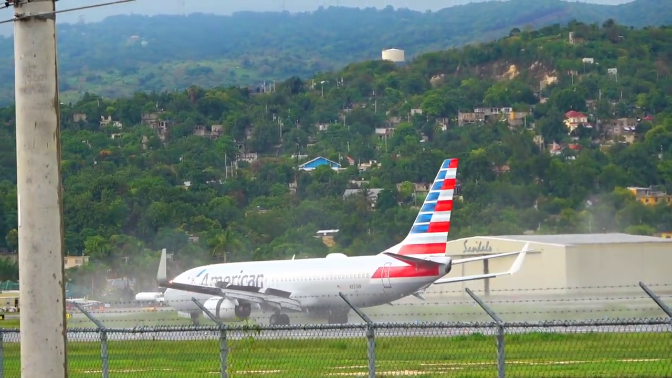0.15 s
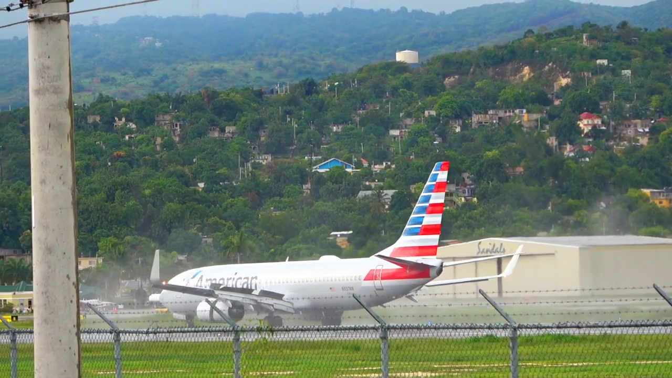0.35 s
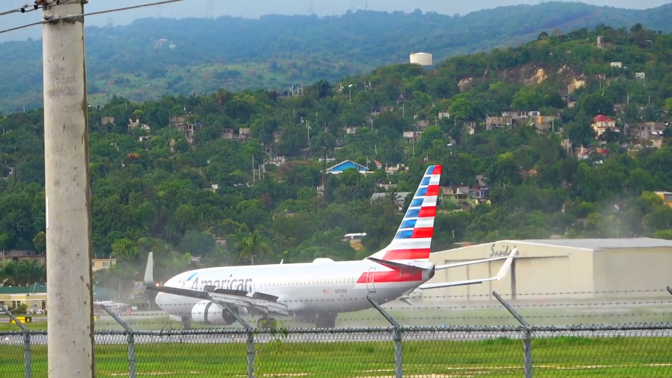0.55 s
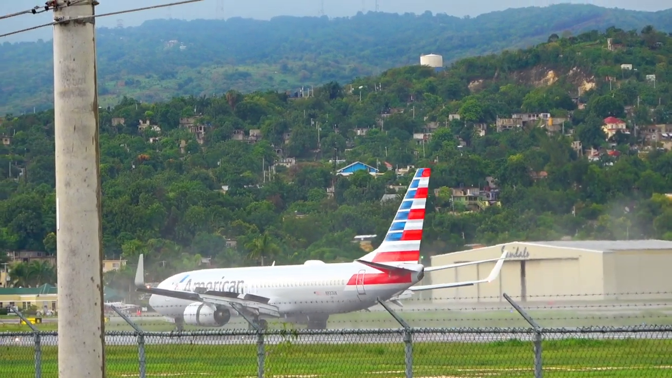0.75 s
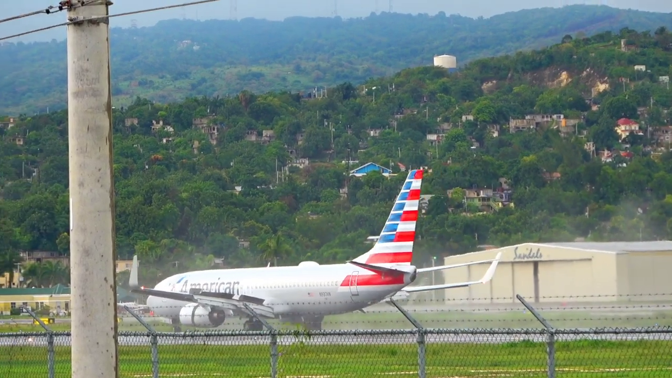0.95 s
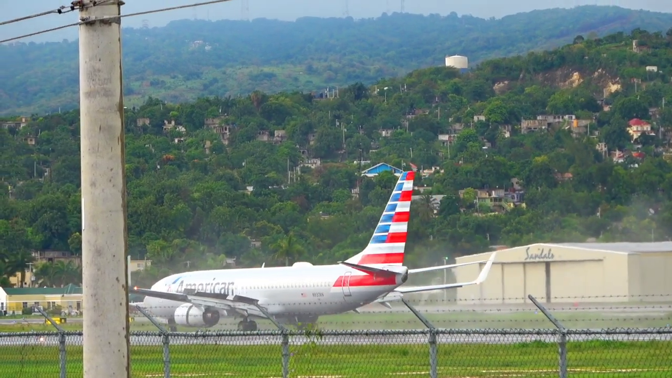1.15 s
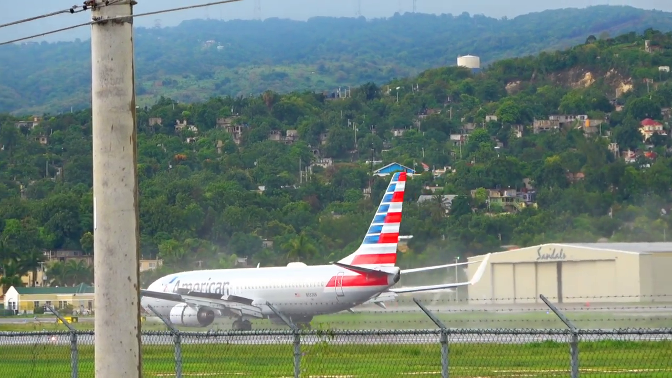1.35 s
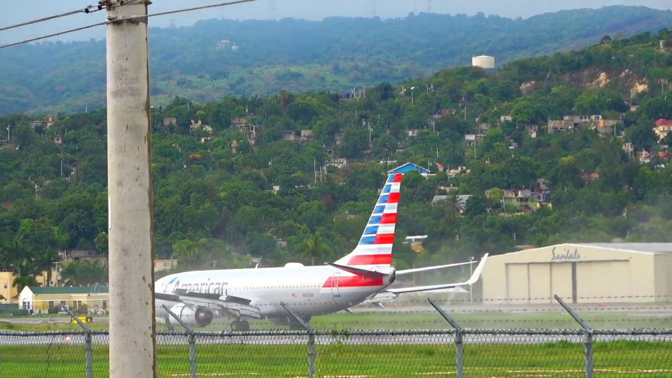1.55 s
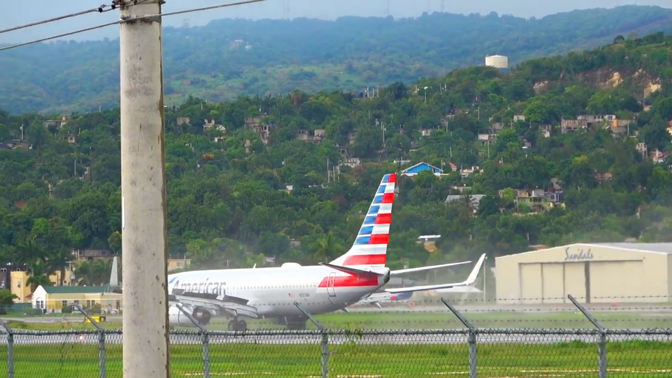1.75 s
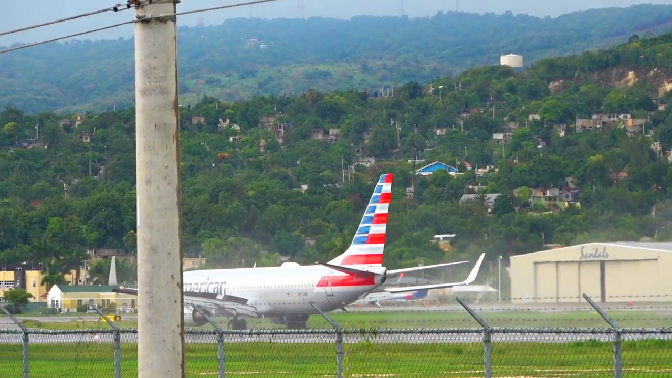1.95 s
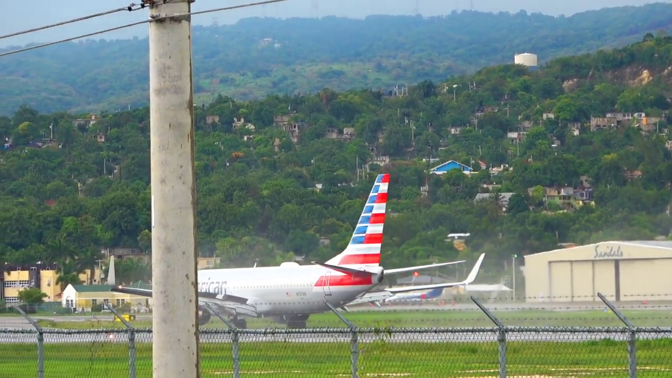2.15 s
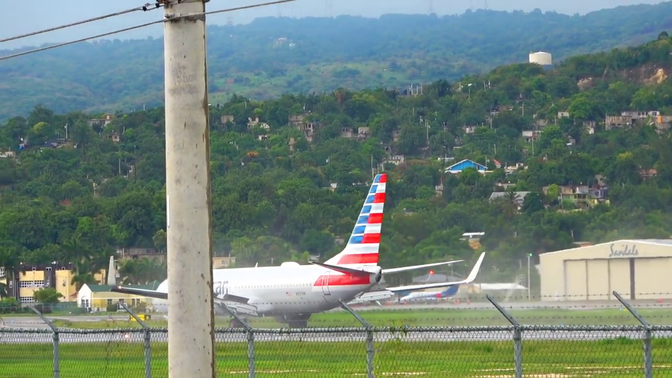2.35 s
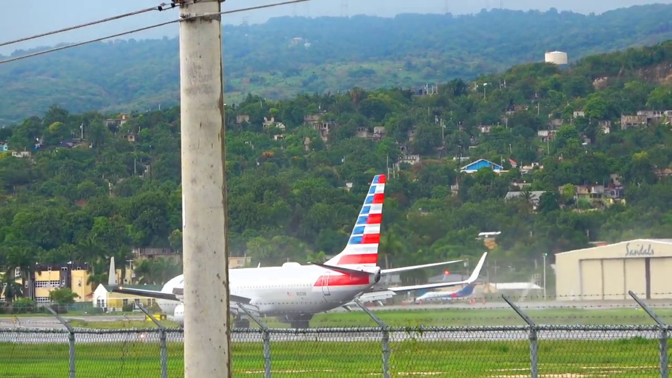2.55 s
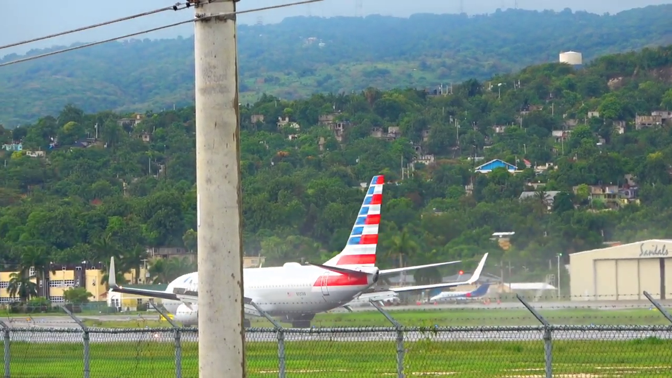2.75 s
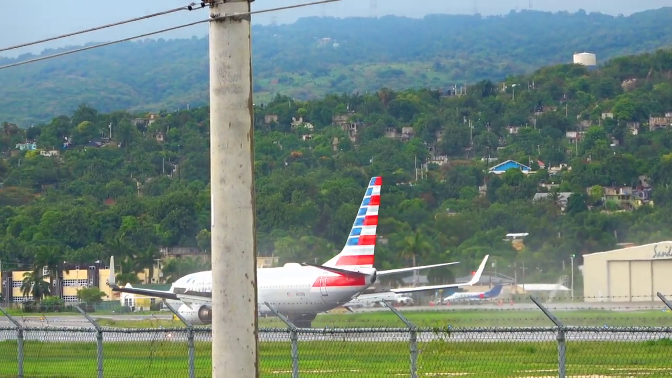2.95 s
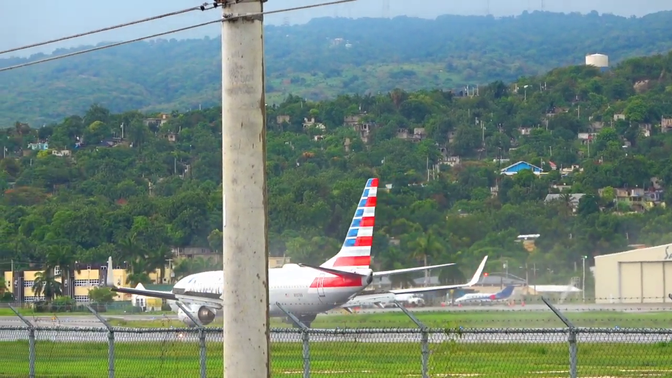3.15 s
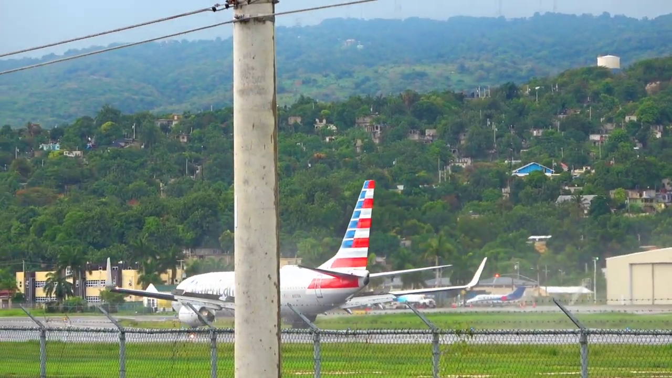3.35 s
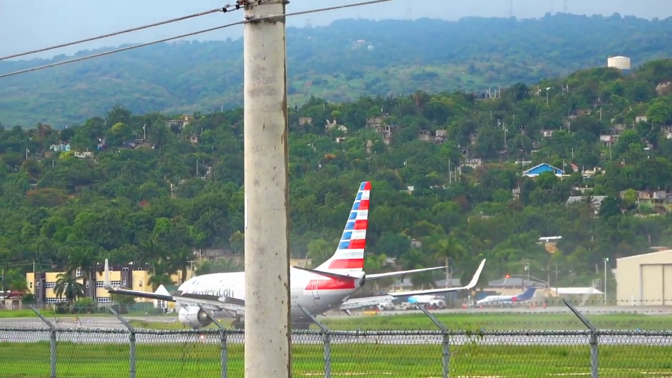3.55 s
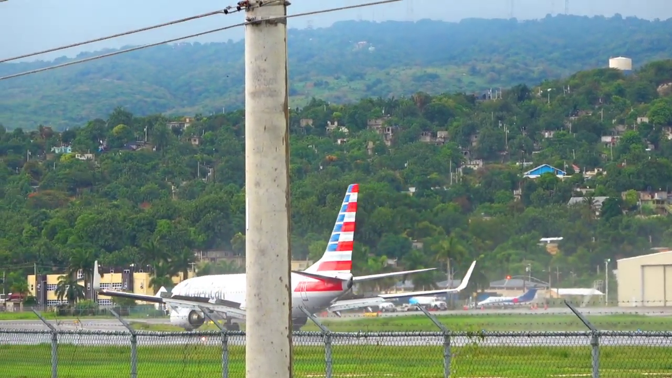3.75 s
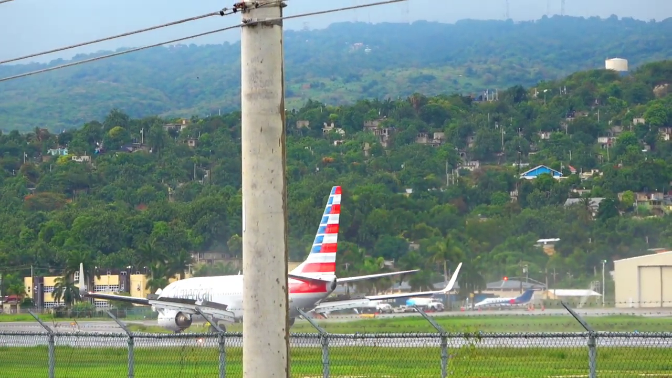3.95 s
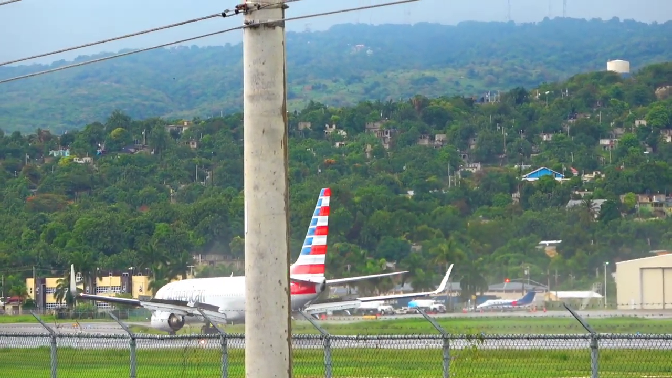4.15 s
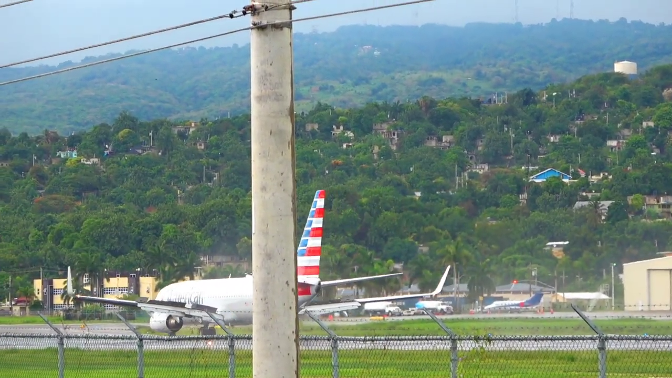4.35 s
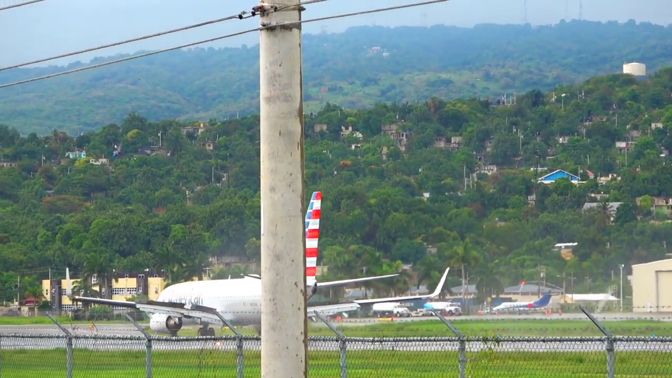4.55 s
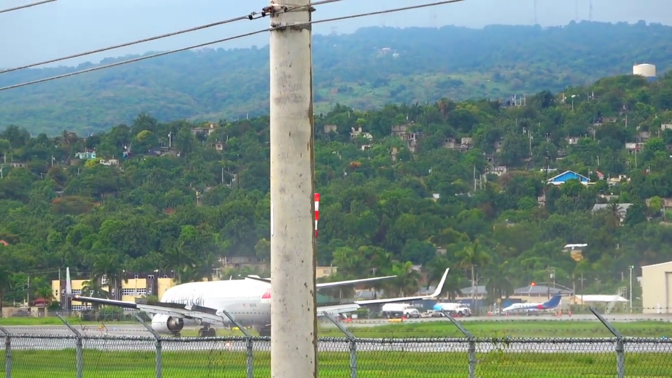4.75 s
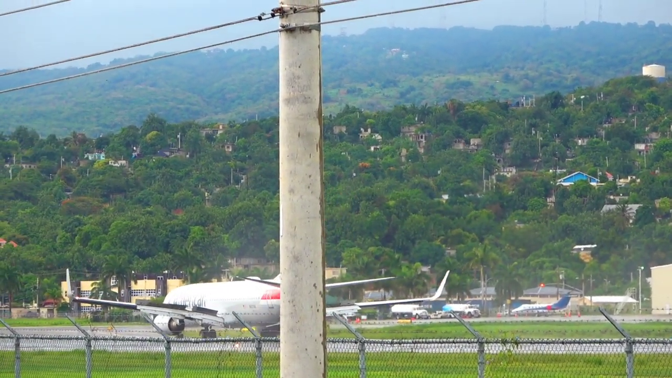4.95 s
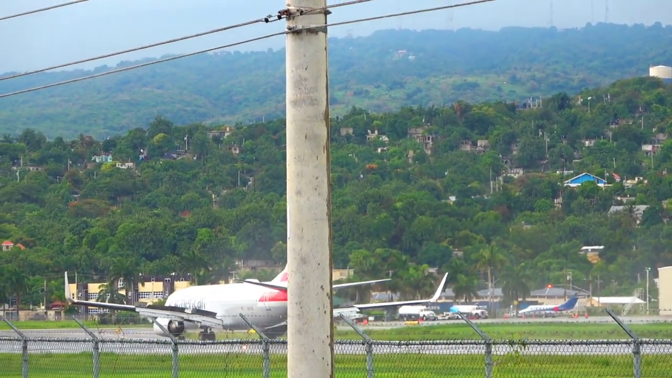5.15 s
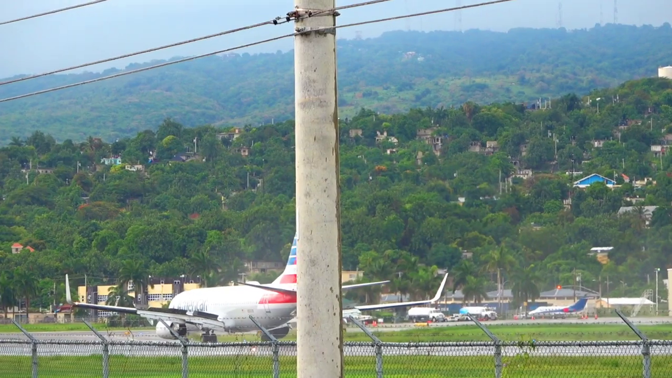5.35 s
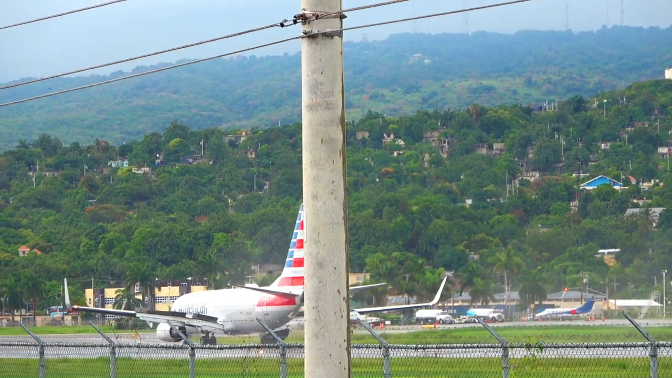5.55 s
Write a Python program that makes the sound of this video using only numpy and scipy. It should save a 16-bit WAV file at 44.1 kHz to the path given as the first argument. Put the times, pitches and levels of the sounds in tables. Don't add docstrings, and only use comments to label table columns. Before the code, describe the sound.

Heard across open grass, a rumbling jet engine roar fades as thrust is cut, leaving thin falling whines, a camera click and two soft taps.

```python
import sys
import numpy as np
from scipy import signal
from scipy.fft import rfft, irfft, next_fast_len
from scipy.io import wavfile

SR = 44100
rng = np.random.default_rng(int(sys.argv[2]) if len(sys.argv) > 2 else 0)


def wav_out(sig):
    wavfile.write(sys.argv[1], SR, np.round(np.clip(np.atleast_2d(sig).T, -1, 1) * 32767).astype(np.int16))


def undo_db(level):
    steps = np.asarray(level, float) / 20
    return 10 ** steps


N = 251370
PADDED = next_fast_len(N + 8192)
HZ = np.maximum(np.fft.rfftfreq(PADDED, 1 / SR), 1)

# frequency_hz, density_db
SELF_NOISE_COLOUR = [(4000, 4.5), (8000, 3.5), (10000, 0.5), (13000, 0.5), (15000, -4), (15500, -3.5)]
# frequency_hz, density_db
AMBIENCE_COLOUR = [(12, -40.5), (20, -9.5), (53, 1.5), (406, -4.5), (460, -9), (592, -1.5), (654, -9.5),
                   (3180, -26.5), (3790, -24), (8040, -45), (10500, -75.5), (17700, -120)]
# frequency_hz, density_db
GUST_COLOUR = [(900, -13.5), (1600, 1), (2800, 5), (4300, 0.5), (5500, -20), (8000, -27)]
# start_s, peak_db, t60_s, left_minus_right_db
TICKS = [
    (1.482, -50, .006, 6),
    (1.4897, -29.5, .014, 3),
]
# start_s, peak_db, body_hz, early_extra_turns, turns_time_s
KNOCKS = [
    (4.8115, -19, 290, .53, .0004),
    (5.1209, -16.5, 160, .85, .0007),
]
# heard_s, pitch_hz, idle_hz, rundown_s, level_db, slope_db_per_s
COMPRESSOR_LAW = (2.75, 4790, 3400, 2.0, -70, -2.4)
TURBINE_LAW = (1.9, 7380, 5000, 8.5, -86, 0)
# centre_s, half_length_s, gain_db
COMPRESSOR_FLARES = [
    (4.06, .13, 5),
    (4.7, .2, -2),
    (5.35, .06, 1.5),
]
TURBINE_FLARES = [
    (3.8, .15, 2),
    (4.4, .3, -4),
    (5.15, .3, 3.5),
]
# low_hz, high_hz
JET_ZONES = [(40, 190), (190, 420), (480, 1800), (1800, 5000), (5000, 9000)]
# start_db, share_of_power_swing
ZONE_LAWS = [(-24, 0.82), (-23, 1.27), (-26, 0.98), (-29.5, 1.61), (-44.5, 1.57)]
# time_s, level_re_start_db
POWER = [(0, 0), (.2, -0.5), (.5, -3.5), (1.0, -3), (1.4, -4), (1.8, -4), (2.2, -7), (2.6, -9.5),
         (3.0, -11), (3.5, -13), (4.0, -16.5), (4.4, -20.5), (5.0, -20.5), (5.7, -26)]
# frequency_hz, density_db
JET_COLOUR = [(12, -38.5), (20, -37.5), (60, -6.5), (145, 4), (280, -2), (360, -6.5), (430, -15),
              (1100, -13), (1800, -19), (3000, -30), (4400, -33), (6400, -44), (8000, -56.5), (10000, -71),
              (16000, -100)]
# centre_hz, width_hz, gain_db
RIPPLES = [(197, 99, -1), (268.4, 49, 3), (437, 40, -8), (570, 70, 4.5), (640, 70, -0.5), (795, 96, 3),
           (860, 55, -3), (1065, 840, 3.5), (1960, 620, 2), (2890, 60, 5), (3000, 280, 0)]
# centre_s, half_length_s, centre_hz, gain_db
SWELLS = [(0.337, .1, 150, 3.5), (0.65, .12, 290, 5.5), (.6, .2, 6000, 3), (1.053, 0.053, 100, -9.5),
          (1.3, 0.14, 280, 1), (1.47, 0.071, 1650, 4), (2.0, 0.14, 130, 3), (1.9, .2, 7260, -4.5),
          (2.522, 0.052, 200, 5.5), (2.542, 0.11, 380, 6.5), (2.76, 0.11, 275, 7), (2.65, 0.36, 100, -5),
          (2.845, 0.047, 1800, -1.5), (2.987, 0.028, 123, 10), (3.763, 0.057, 208, 8),
          (3.917, 0.094, 261, 11), (4.133, 0.094, 220, 10.5), (4.066, 0.037, 1700, 3.5),
          (4.397, .1, 119, 8), (4.55, .1, 600, 0), (4.98, 0.078, 920, 5), (5.0, 0.056, 210, 4),
          (5.25, 0.066, 110, -1.5), (5.42, 0.055, 139, 7)]
# frequency_hz, side_minus_mid_db
SIDE_SHARE = [(60, -24.5), (100, -27), (180, -33.5), (300, -52), (520, -16), (880, -21), (1510, -25),
              (2590, -22), (4430, -30), (7590, -9.5)]
# frequency_hz, left_minus_right_db
TILT = [(60, -4.5), (100, -3), (180, -2), (300, -3), (520, -5.5), (880, -2.5), (1510, -5), (2590, 0),
        (4430, -2), (7590, -4)]
# time_s, left_minus_right_db
BEARING = [(0, 3), (4.3, 2.5), (5.0, 1.7), (5.7, 1)]


def rms_one(x):
    return x / np.sqrt(np.mean(x ** 2) + 1e-20)


def bell(x, centre, half_width):
    return np.exp(-.5 * ((x - centre) / half_width) ** 2)


def in_time(rows):
    s, *columns = np.transpose(rows)
    return [np.interp(np.arange(N) / SR, s, column) for column in columns]


def at_hz(points, hz):
    point_hz, point_db = np.array(points).T
    return np.interp(np.log(hz), np.log(point_hz), point_db)


def drift(rate_hz):
    pole = np.exp(-80 * np.pi * rate_hz / SR)
    raw = rng.standard_normal(N // 40 + 2002)
    slow = signal.lfilter([1], [1, -2 * pole, pole * pole], raw)[2000:]
    return np.interp(np.arange(N) / 40, np.arange(len(slow)), rms_one(slow))


def panned(x, left_db):
    return x * undo_db(np.array([left_db / 2, -left_db / 2])).reshape(2, -1)


def stereo_spectrum(colour_db, side_db):
    mid, side = rfft(rng.standard_normal((2, PADDED))) * undo_db(colour_db)
    side = side * undo_db(side_db)
    return np.array([mid + side, mid - side])


def steady(colour, level_db, side_db):
    inside = (HZ >= colour[0][0]) & (HZ <= colour[-1][0])
    spectrum = stereo_spectrum(at_hz(colour, HZ), side_db) * inside
    return undo_db(level_db) * rms_one(irfft(spectrum, PADDED)[:, :N])


def self_noise():
    return steady(SELF_NOISE_COLOUR, level_db=-73.5, side_db=-6.5)


def ambience():
    return panned(steady(AMBIENCE_COLOUR, level_db=-45, side_db=-17.5), left_db=-1.0)


def gust():
    peak_s, hold_s, peak_db = 4.95, .12, -55.5
    rise_db_per_s, fall_db_per_s = 40, 55
    late = np.arange(N) / SR - peak_s
    rise_db = rise_db_per_s * np.maximum(-late, 0)
    fall_db = fall_db_per_s * np.maximum(late - hold_s, 0)
    rustle_db = peak_db - rise_db - fall_db + 1.6 * drift(30.0)
    return panned(steady(GUST_COLOUR, rustle_db, side_db=-18), left_db=-1.5)


def ticks():
    out, t = np.zeros((2, N)), np.arange(1500) / SR
    resonance = signal.butter(1, [5000, 8000], "band", fs=SR, output="sos")
    top_limit = signal.butter(6, 13800, fs=SR, output="sos")
    for start_s, peak_db, t60_s, left_db in TICKS:
        mid, side = rng.standard_normal((2, len(t))) * undo_db(peak_db - 60 * t / t60_s)
        burst = np.array([mid + .3 * side, mid - .3 * side])
        burst = signal.sosfilt(top_limit, signal.sosfilt(resonance, burst))
        first = round(start_s * SR)
        out[:, first:first + len(t)] += panned(burst, left_db)
    return out


def knocks():
    out, t = np.zeros((2, N)), np.arange(2000) / SR
    t60_s = .035
    fingertip = signal.butter(2, 1900, fs=SR, output="sos")
    for start_s, peak_db, body_hz, turns, fast_s in KNOCKS:
        phase = body_hz * t + turns * (1 - np.exp(-t / fast_s))
        swell = (1 - np.exp(-t / .0005)) * (.6 + .9 * np.exp(-t / .0014))
        tap = -np.sin(2 * np.pi * phase) * swell * undo_db(peak_db - 60 * t / t60_s)
        tap = signal.sosfilt(fingertip, tap)
        first = round(start_s * SR)
        out[:, first:first + len(t)] += panned(tap, left_db=2.0)
    return out


def whine(law, flares, width_hz, scint_db, gain_db):
    heard_s, heard_hz, idle_hz, rundown_s, heard_db, db_per_s = law
    t = np.arange(N) / SR
    since = t - heard_s
    pitch_hz = idle_hz + (heard_hz - idle_hz) * np.exp(-np.maximum(since, -.4) / rundown_s)
    flare_db = sum(db * bell(t, s, half) for s, half, db in flares)
    level_db = heard_db + db_per_s * since + flare_db
    carrier = np.exp(2j * np.pi * np.cumsum(pitch_hz) / SR)
    blur = .85 + drift(width_hz) + 1j * drift(width_hz)
    fade_in = np.clip(since / .4 + 1, 0, 1)
    scintillation_db = scint_db * drift(3.0)
    return rms_one((carrier * blur).real) * fade_in * undo_db(level_db + gain_db + scintillation_db)


def compressor():
    core = whine(COMPRESSOR_LAW, COMPRESSOR_FLARES, width_hz=45.0, scint_db=.8, gain_db=0.5)
    skirt = whine(COMPRESSOR_LAW, COMPRESSOR_FLARES, width_hz=190.0, scint_db=1.5, gain_db=2.5)
    return core + skirt


def turbine():
    return whine(TURBINE_LAW, TURBINE_FLARES, width_hz=50.0, scint_db=.8, gain_db=2.5)


def jet():
    own_db, fast_db = 0.66, 0.64
    swell_octaves = 0.33
    t = np.arange(N) / SR
    ripple_db = sum(db / (1 + (2 * (HZ - hz) / width) ** 2) for hz, width, db in RIPPLES)
    noise = stereo_spectrum(at_hz(JET_COLOUR, HZ) + ripple_db, at_hz(SIDE_SHARE, HZ) - 3)
    noise = panned(noise, at_hz(TILT, HZ))

    power_db = in_time(POWER)[0]
    wanted_db = np.array([db + share * power_db for db, share in ZONE_LAWS])
    power = np.abs(noise.mean(0)) ** 2 * 2 / PADDED ** 2
    plain_db = np.array([10 * np.log10(power[(HZ > lo) & (HZ < hi)].sum()) for lo, hi in JET_ZONES])
    zone_db = wanted_db - plain_db[:, None]
    zone_octave = [np.log2(lo * hi) / 2 for lo, hi in JET_ZONES]

    humps = [(np.log2(hz), db * bell(t, s, half)) for s, half, hz, db in SWELLS]
    out = 0
    for octave in np.arange(4.5, 14.3, 1 / 3):
        window = np.clip(1 - 3 * np.abs(np.log2(HZ) - octave), 0, 1)
        place = np.interp(octave, zone_octave, np.arange(len(JET_ZONES)))
        low = min(int(place), len(JET_ZONES) - 2)
        level_db = zone_db[low] + (place - low) * (zone_db[low + 1] - zone_db[low])
        flutter_db = own_db * drift(3.76) + fast_db * drift(4.7)
        swell_db = sum(bell(octave, centre, swell_octaves) * hump for centre, hump in humps)
        band = irfft(noise * window, PADDED)[:, :N]
        out = out + undo_db(level_db + swell_db + flutter_db) * band
    return out


def scene():
    background = ambience() + gust()
    camera = ticks() + knocks()
    aircraft = panned(compressor() + turbine() + jet(), in_time(BEARING)[0])
    return background + camera + aircraft


def top_cut(x):
    return signal.sosfilt(signal.butter(12, 15490, fs=SR, output="sos"), x)


def record(dry):
    mix = dry + self_noise()
    return top_cut(mix)


dry = scene()
out = record(dry)
wav_out(out)
```